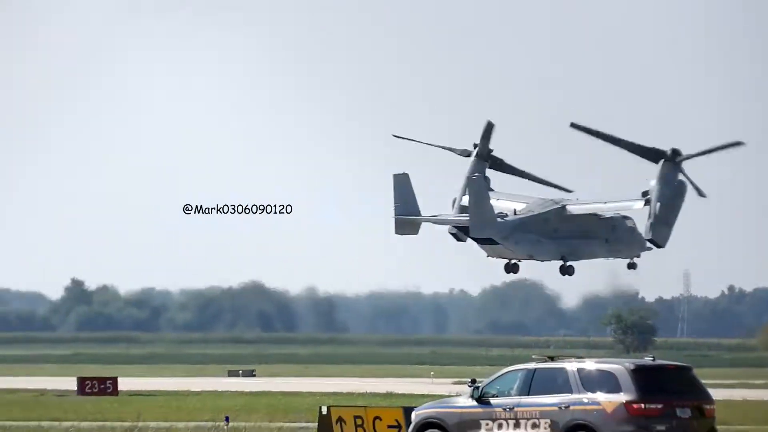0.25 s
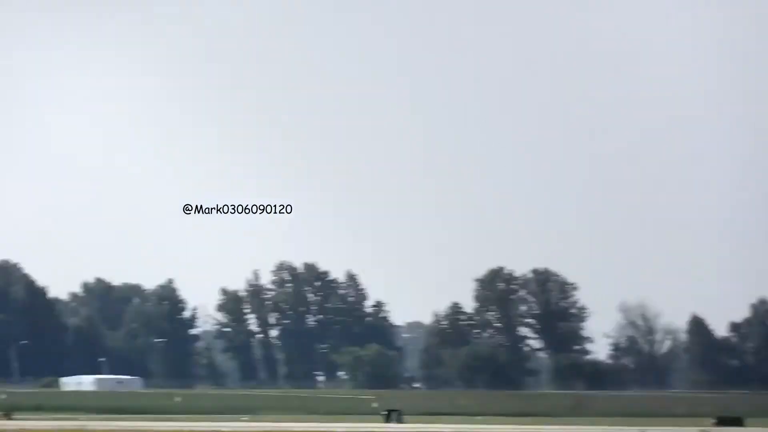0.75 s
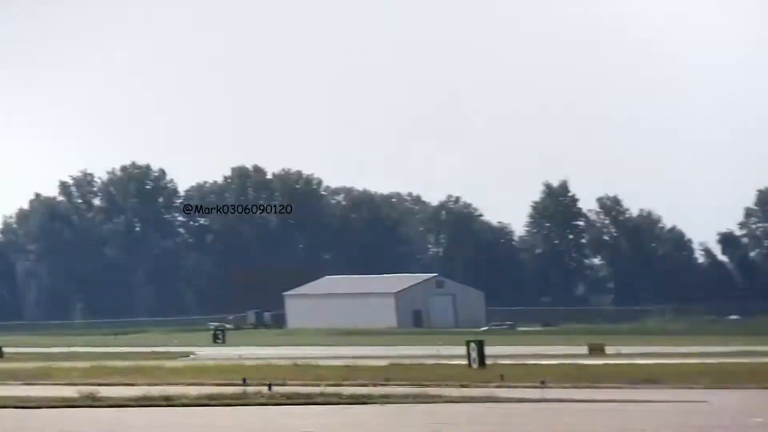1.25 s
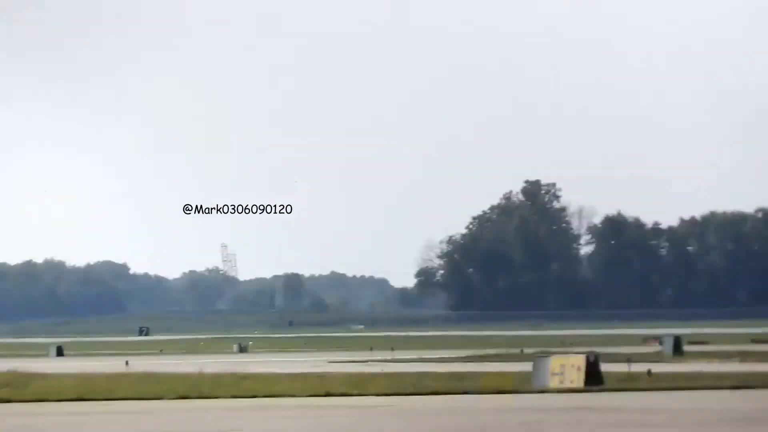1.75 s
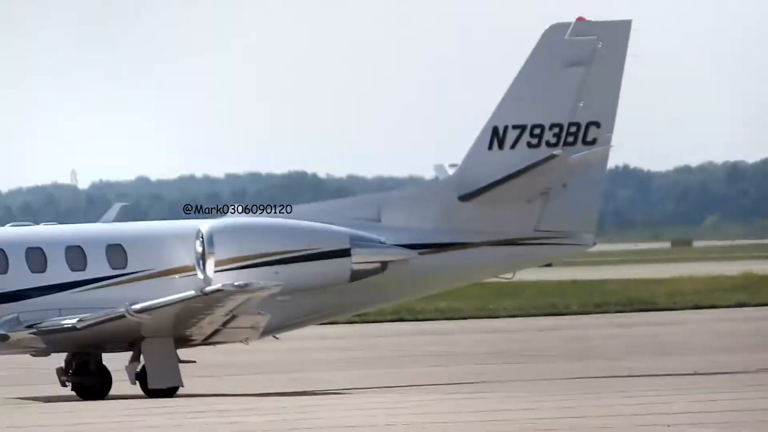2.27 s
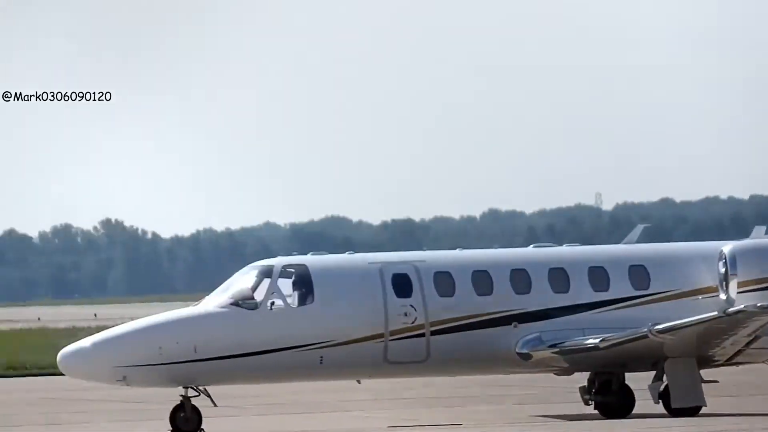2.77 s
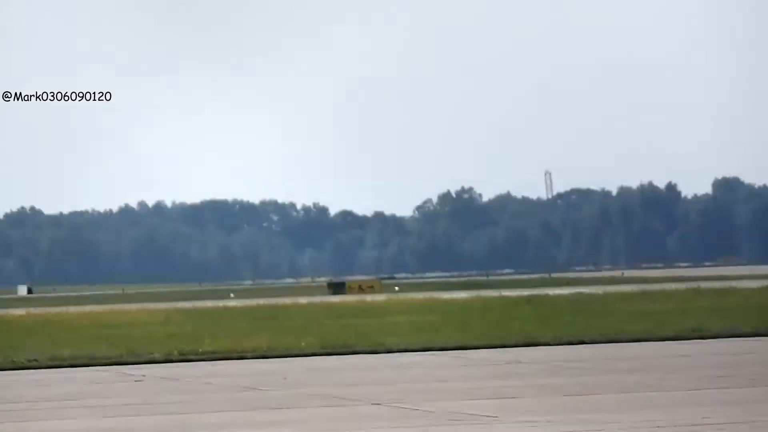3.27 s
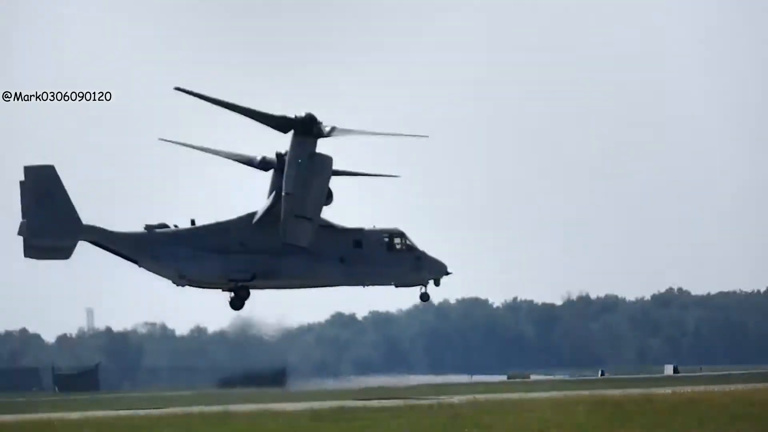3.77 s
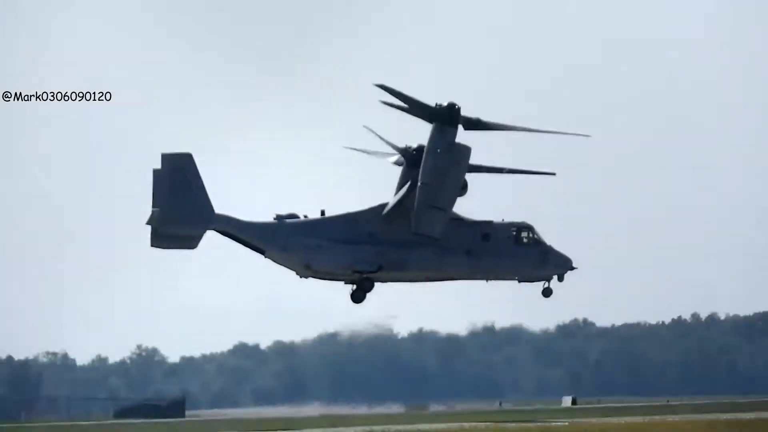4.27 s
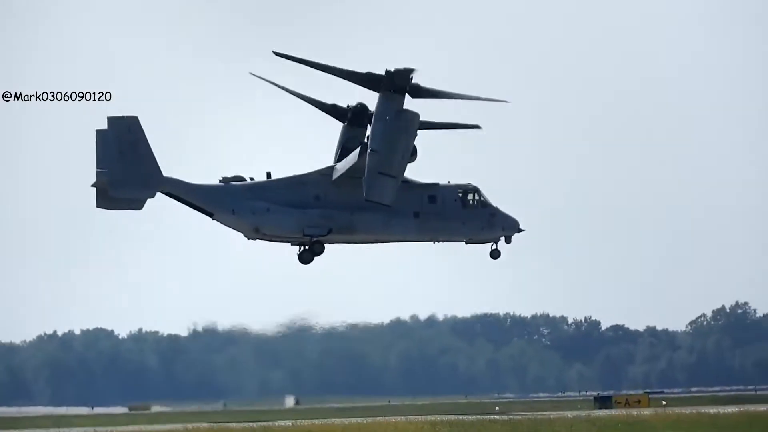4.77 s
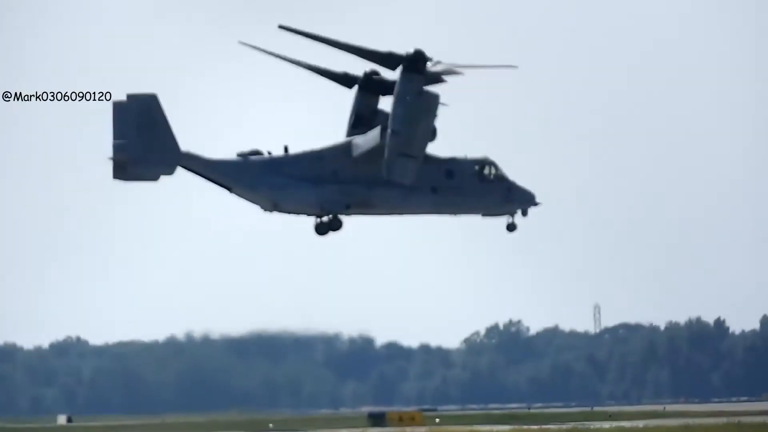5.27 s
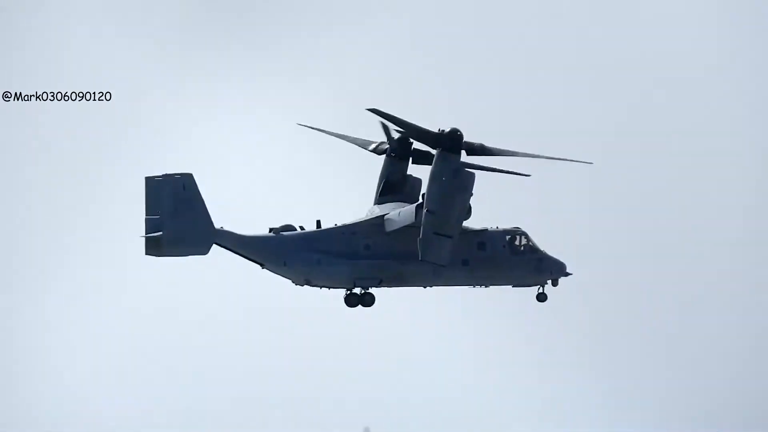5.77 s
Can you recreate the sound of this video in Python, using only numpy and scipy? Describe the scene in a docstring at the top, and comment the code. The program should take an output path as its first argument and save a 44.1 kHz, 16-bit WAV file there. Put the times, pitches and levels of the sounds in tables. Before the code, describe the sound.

Gusty, ragged wind puffs over a steady rotor throb and engine roar, then loud chopping blade slaps crackle and gradually soften.

```python
"""An airfield: tiltrotor aircraft lift off across it, heard by the two microphone ports of a small camera.
The right port faces aircraft and wind; the camera body shadows the left one, which is duller.
Noise in seven bands gives rotor thrum, turbine roar and thin jet hiss, chopped by blade throb and slaps.
Gusts of noise and short gliding swings buffet the right port, with a trace on the left.
Hard limiting flattens whatever exceeds full scale, as in the loudest bursts."""
import sys
import numpy as np
from scipy import signal
from scipy.fft import rfft, irfft
from scipy.io import wavfile
from scipy.ndimage import uniform_filter1d

SR = 44100
rng = np.random.default_rng(int(sys.argv[2]) if len(sys.argv) > 2 else 0)


def to_wav(s):
    """Save 16-bit WAV."""
    ch = np.atleast_2d(s).T  # columns
    pcm = np.round(np.clip(ch, -1, 1) * 32767)  # PCM
    wavfile.write(sys.argv[1], SR, pcm.astype(np.int16))


N = 265482

# Levels of the steady aircraft noise by band, low to high; one aircraft draws off, the next nears:
# t/s, deep thrum level/dB, rotor thrum level/dB, turbine roar level/dB, upper roar level/dB,
# top of the roar level/dB, lower jet hiss level/dB, upper jet hiss level/dB
FLIGHT_LEVELS = [(0.0, -40, -24, -29, -48, -40.5, -61, -54),
                 (0.3, -35.5, -21.5, -37, -39.5, -45, -49.5, -65),
                 (0.8, -35, -21, -35.5, -37.5, -49, -51, -61.5),
                 (1.2, -39, -24, -38, -40.5, -55.5, -58.5, -58.5),
                 (1.75, -39.5, -25.5, -34.5, -40.5, -49.5, -58.5, -55.5),
                 (2.2, -33, -21.5, -31.5, -34, -55, -62, -52.5),
                 (2.7, -32, -21.5, -26, -38, -45.5, -53.5, -54.5),
                 (3.15, -29, -20.5, -27.5, -37.5, -43.5, -54, -52),
                 (3.4, -28.5, -14.5, -21.5, -42, -42.5, -50, -53),
                 (3.8, -35.5, -17.5, -18, -33.5, -48, -45.5, -55),
                 (4.2, -30.5, -18.5, -22.5, -38.5, -41.5, -47.5, -53.5),
                 (4.75, -36.5, -20, -21, -44, -36.5, -51.5, -52.5),
                 (5.05, -30.5, -18, -21, -50, -41, -52.5, -56),
                 (5.6, -29.5, -22, -21.5, -51, -38.5, -53.5, -53.5),
                 (6.02, -34.5, -22, -23.5, -45, -39, -63, -56)]
# Blade throb; motion and a second aircraft shift the beat:
# t/s, lead over a steady beat/blade passes, depth/dB
BLADE_THROB = [(0, -1.56, -2), (.6, -1.49, 1.5), (1.4, -0.92, -0.5), (2.0, -0.91, 1.5), (2.6, -0.65, 1),
               (3.0, -0.46, 1.5), (3.4, -0.16, 2), (3.7, -0.067, 2), (4.0, -0.27, 2), (4.2, 0.42, 0.5),
               (4.6, .38, 2), (4.8, .5, 1.3), (5.05, 0.42, 0.2), (5.25, 0.82, -0.5), (5.7, 0.92, 1),
               (6.1, 0.95, -0.3)]
# Strong wind puffs at the right port: t/s, level/dB, f 1.2 ms before the peak/Hz, length/s
STRONG_PUFFS = [(0.131, -9.5, 1170, .0056), (0.139, -9, 797, .005), (0.169, -8.5, 874, .012),
                (0.1825, 1.5, 1050, .007), (0.25, -14.5, 2017, .0047), (0.258, -6, 1403, .006),
                (0.323, -10.5, 1300, .0062), (0.357, -19, 800, .01), (0.451, -15, 914, 0.0093),
                (0.458, -9.5, 897, 0.013), (0.541, -11, 804, 0.0047), (0.553, -4.5, 1150, .007),
                (0.575, -4.5, 1086, .004), (0.611, -16, 800, .012), (0.664, -15.5, 798, 0.014),
                (0.716, -13, 810, 0.0055), (0.763, -11, 800, .007), (0.785, -8.5, 1396, 0.0082),
                (0.811, -8.5, 807, 0.0063), (0.824, -10.5, 953, 0.011), (0.884, -10, 799, .006),
                (1.048, -6, 1294, .007), (1.063, -17, 1400, .004), (1.072, -8.5, 1705, .007),
                (1.085, -9, 830, .0063), (1.107, -10, 856, .009), (1.113, -11, 940, .009),
                (1.138, -11.5, 1274, .005), (1.185, -7.5, 1055, .006), (1.201, -8, 1167, .008),
                (1.232, -13, 1300, .0097), (1.276, -13.5, 1100, .005), (1.29, -11.5, 900, .008),
                (1.313, -9.5, 900, .005), (1.376, -15, 1300, .008), (1.418, -9, 1009, 0.006),
                (1.439, -10, 1078, .005), (1.446, -8.5, 1205, .007), (1.488, -11, 1338, 0.0045),
                (1.502, -12, 898, .006), (1.509, -5.5, 1450, .006), (1.66, -9.5, 1113, .008),
                (1.718, -13.5, 800, .013), (1.915, -9.5, 1025, .0057), (2.765, -6.5, 943, .005),
                (3.062, -11.5, 988, .011), (5.649, -10, 850, .008), (5.658, -8.5, 1150, .004),
                (5.668, -7.5, 990, .01), (5.685, -5, 1142, 0.007), (5.692, -9, 996, .008),
                (5.708, -7, 1200, .008), (5.739, -14.5, 936, .01), (5.875, -10, 880, .009)]
# Colour of the right port, with its bass cut and two resonances: f/Hz, level/dB
RIGHT_PORT_COLOUR = [(30, -62), (60, -55.5), (95, -47.5), (130, -36.5), (200, -21), (300, -9.5), (390, -7),
                     (450, -1), (540, -4), (670, 3), (790, 2), (900, -3.5), (1100, -3.5), (1500, -7),
                     (2000, -2), (2400, -0.5), (2750, -4.5), (3000, -10.5), (3300, -14), (4400, -26.5),
                     (4800, -33), (5600, -42.5), (7600, -49), (9000, -64), (11000, -74.5)]

BLADE_HZ = 20  # steady blade-pass beat, which the lead then shifts
PORT_LAG_S = .002  # the port rings up late
CRACK_S = .0055  # nominal length of a crack


def undb(db):
    """Amplitude ratio of a level in dB."""
    return 10 ** (np.asarray(db) / 20)


def curve(table):
    """Columns of a table joined by straight lines in time."""
    s, *columns = np.transpose(table)
    return [np.interp(np.arange(N) / SR, s, c) for c in columns]


def colour(x, points, size=2048):
    """Causal minimum-phase filter with the gain of (f/Hz, level/dB) points, from the folded cepstrum."""
    hz, db = np.transpose(points)
    f = np.maximum(np.arange(size // 2 + 1) * SR / size, 1)
    log_gain = np.interp(np.log(f), np.log(hz), db) * np.log(10) / 20
    cepstrum = irfft(log_gain)
    cepstrum[1:size // 2] *= 2
    cepstrum[size // 2 + 1:] = 0
    impulse = irfft(np.exp(rfft(cepstrum)))
    return signal.fftconvolve(x, impulse)[:N]


def bands(edges_hz):
    """One noise split at the edges; each part is scaled to rms 1 as heard through the right port."""
    spectrum = rfft(rng.standard_normal(N))
    f = np.arange(len(spectrum)) * SR / N
    slopes = [1 / (1 + (f / hz) ** 8) for hz in edges_hz]
    below = [np.zeros(len(f))] + slopes + [np.ones(len(f))]
    parts = [irfft(spectrum * (hi - lo), N) for lo, hi in zip(below, below[1:])]
    # the first third is enough to gauge the level
    return [p / np.std(colour(p[:N // 3], RIGHT_PORT_COLOUR)) for p in parts]


def flicker(rate, depth_db):
    """Gain that moves to a new random level rate times a second, slewed; mean power 1."""
    hold = max(int(SR / rate), 2)
    steps = np.repeat(rng.standard_normal(N // hold + 1), hold)
    walk = uniform_filter1d(steps, hold)[:N]
    gain = undb(depth_db * walk)
    return gain / np.sqrt(np.mean(gain ** 2))


def around(s, length):
    """Samples that a short event at s can reach, and their time from its peak in seconds."""
    near = slice(max(int((s - 3 * length) * SR), 0), int((s + 4 * length) * SR))
    return near, (np.arange(N) / SR)[near] - s


def bumps(times, dbs, lengths, rise=0.62, fall=1.52):
    """Power of short bursts that swell quicker than they fade."""
    power = np.zeros(N)
    for s, db, length in zip(times, dbs, lengths):
        near, dt = around(s, length)
        width = length * np.where(dt < 0, rise, fall) / 2
        power[near] += undb(2 * db) * np.exp(-(dt / width) ** 2)
    return power


def wavelets(times, dbs, lengths, from_hz, to_hz, rough, band_hz, rise, fall):
    """Short swings that glide from one pitch to another within a few ms, with a wandering phase."""
    out = np.zeros(N)
    wander = np.cumsum(uniform_filter1d(rng.standard_normal(N), size=12)) * rough
    for s, db, length, f0, f1 in zip(times, dbs, lengths, from_hz, to_hz):
        near, dt = around(s, length)
        # f0 at 1.2 ms before the peak, f1 at 1.8 ms after it, and a little beyond both
        hz = f1 * (f0 / f1) ** np.clip((.0018 - dt) / .003, -.4, 3.0)
        width = length * np.where(dt < 0, rise, fall) / 2
        shape = np.exp(-(dt / width) ** 2 / 2)
        swing = np.sin(2 * np.pi * np.cumsum(hz) / SR + wander[near])
        out[near] += np.sqrt(2) * undb(db) * shape * swing
    # the port passes neither deep bass nor high treble
    return signal.sosfiltfilt(signal.butter(4, band_hz, "band", fs=SR, output="sos"), out)


def aircraft(s, thump_s, thump_db, crack_db, length):
    """Rotor and engine noise in free air, twice: the direct sound and what scatters round the camera."""
    # borders between the seven bands: f/Hz
    split_hz = [350, 1450, 3300, 4200, 5400, 6400]
    # swing of each band between and on the blade passes, low to high: level/dB for each dB of throb
    chop_per_throb = [2.9, 1.23, 1.17, 1.3, 1.2, 1.2, 0.99]
    # a slap is a cluster of vortex hits, so its thump is ragged
    thumps = bumps(thump_s - PORT_LAG_S, thump_db, length, rise=0.55, fall=1.25)
    thumps = thumps * flicker(240, 2.6) ** 2
    cracks = bumps(s, crack_db, np.full(len(s), 0.33 * CRACK_S))
    # between the slaps the blades still throb, and turbulence roughens everything at once
    lead, depth_db = curve(BLADE_THROB)
    swing = np.cos(2 * np.pi * (BLADE_HZ * np.arange(N) / SR + lead - .08))
    rough = flicker(70, 0.94)
    throbs = [undb(chop * depth_db * swing) * rough for chop in chop_per_throb]
    # slap power in each band: thumps lie low, cracks high
    slap_powers = (undb(-30.0) * thumps,
                   undb(-11) * thumps,
                   undb(-41.5) * thumps + undb(-6.5) * cracks,
                   undb(-43) * cracks,
                   undb(-40.5) * cracks,
                   undb(-60) * cracks,
                   undb(-64) * cracks)
    gains = []
    for db, throb, slap_power in zip(curve(FLIGHT_LEVELS), throbs, slap_powers):
        steady = undb(db) * throb * flicker(28, 0.95)
        gains.append(np.sqrt(steady ** 2 + slap_power))
    # same gains, independent noise
    return [sum(gain * part for gain, part in zip(gains, bands(split_hz))) for _ in range(2)]


def slaps():
    """Blade slaps as columns (t, thump t, thump dB, crack dB, length): strong ones, faint ones on the beat."""
    # the strong slaps: t/s, dull thump level/dB, sharp crack level/dB, length of the thump/s
    strong = [(0.558, -11, -40, 0.025), (0.672, -16.5, -29, 0.017), (0.763, -14, -31, 0.019),
              (1.947, -16, -32, 0.0077), (1.999, -16.5, -33, 0.016), (2.042, -22, -22, .015),
              (2.095, -15.5, -24, 0.025), (2.152, -18, -19.5, .015), (2.2025, -29, -16.5, 0.018),
              (2.339, -17, -44, .036), (2.4464, -40, -17, 0.04), (2.4998, -25, -13.5, 0.017),
              (2.5916, -22, -10, 0.014), (2.641, -18, -16, .014), (2.69, -20, -17.5, 0.013),
              (2.786, -26, -22, .014), (2.855, -16, -34, .014), (2.925, -12, -13.5, 0.013),
              (2.973, -21, -20, .016), (3.016, -32, -33, 0.011), (3.128, -13, -16.5, 0.024),
              (3.165, -11, -34, 0.017), (3.2222, -18, -11.5, .015), (3.264, -13, -31, 0.017),
              (3.3095, -10, -5.5, 0.011), (3.3555, -4, -7.5, 0.0088), (3.359, -2, -7, 0.014),
              (3.3635, -7.5, -7, 0.012), (3.369, -13, -9, 0.01), (3.4088, -2.5, -3.5, .012),
              (3.4585, -7, -7.5, .011), (3.476, -17, -35, 0.0069), (3.5025, -25, -10, 0.0054),
              (3.509, -1.5, -1.5, 0.0085), (3.5609, -19, -15, .01), (3.571, -15, -12, 0.032),
              (3.609, -11, -17, .01), (3.6232, -5.5, -6.5, .014), (3.672, -3.5, -12.5, 0.0055),
              (3.7198, -10, -2, 0.011), (3.756, -13, -19, 0.0064), (3.7685, -13, -5, 0.018),
              (3.817, -10, -8, 0.011), (3.8625, -12, -5, 0.014), (3.8745, -11, -14, 0.018),
              (3.9146, -14, -8, 0.01), (3.9625, -32, -12.5, 0.011), (4.0124, -15, -13, .015),
              (4.045, -10.5, -28, 0.013), (4.0638, -21, -15, 0.026), (4.139, -7.5, -15, 0.019),
              (4.187, -9.5, -36, 0.017), (4.236, -10.5, -35, .018), (4.285, -4.5, -30, 0.0068),
              (4.306, -10, -21, 0.017), (4.336, -7.5, -24, 0.0089), (4.385, -12, -19, 0.015),
              (4.407, -10, -31, 0.0047), (4.432, -13.5, -28, .017), (4.485, -18, -21, .014),
              (4.537, -22, -16, 0.015), (4.5706, -22, -15, 0.01), (4.817, -13, -16, .012),
              (4.826, -17, -13, 0.017), (4.834, -27, -12, .01), (4.862, -19, -22, 0.018),
              (4.8784, -23, -12, .01), (4.924, -17.5, -19, .021), (5.262, -13, -17, .017),
              (5.4007, -19, -15.5, 0.017), (5.8612, -30, -20.5, 0.025)]
    thump_lag = 0.2064  # the thump peaks after its crack by this share of its length
    # faint slaps: thump over the thrum, crack over the roar, and their scatter
    pass_thump_db, pass_crack_db, pass_scatter_db, pass_s = -4, -1, 3, .016
    pass_per_throb = 2.2  # dB of slap for each dB of throb
    _, thrum_db, roar_db, *_ = curve(FLIGHT_LEVELS)
    lead, depth_db = curve(BLADE_THROB)
    # the deeper the throb, the harder each pass slaps
    thrum_db = thrum_db + pass_per_throb * depth_db
    roar_db = roar_db + pass_per_throb * depth_db
    beat = np.floor(BLADE_HZ * np.arange(N) / SR + lead)
    at = np.flatnonzero(np.diff(beat) > 0)
    chance = rng.standard_normal((len(at), 3)).T
    faint = np.transpose([at / SR + .003 * chance[0],
                          thrum_db[at] + pass_thump_db + pass_scatter_db * chance[1],
                          roar_db[at] + pass_crack_db + pass_scatter_db * chance[2],
                          np.full(len(at), pass_s)])
    # no faint slap within half a pass of a strong one
    free = np.abs(faint[:, :1] - np.array(strong)[:, 0]).min(axis=1) > .5 / BLADE_HZ
    s, thump_db, crack_db, length = np.transpose(np.vstack([strong, faint[free]]))
    return s, s + thump_lag * length, thump_db, crack_db, length


def slap_rings(s, thump_s, thump_db, crack_db, length):
    """Each crack rings the upper resonance of the port, each thump the lower one."""
    crack_hz = 2189 * np.exp(0.0567 * rng.standard_normal(len(s)))
    cracks = wavelets(s, crack_db, np.full(len(s), .9 * CRACK_S), 0.91 * crack_hz, crack_hz,
                      rough=0.27, band_hz=[700, 5200], rise=0.81, fall=0.79)
    thump_hz = np.full(len(s), 670.5)
    thumps = wavelets(thump_s, thump_db - 1.9, .65 * length, thump_hz, thump_hz,
                      rough=0.0598, band_hz=[350, 1300], rise=0.55, fall=0.85)
    return cracks + thumps


def wind():
    """Eddies on the right port: a ragged rumble, and puffs that mostly fall in pitch as the eddy slows."""
    # gusts at the right port, ahead of the rumble's own offsets: t/s, level/dB
    gust_levels = [(0.0, -36), (0.25, -27), (0.4, -34), (0.65, -27.5), (1.0, -28.5), (1.36, -20.5),
                   (1.6, -21.5), (1.75, -33), (1.88, -29), (2.05, -31), (2.75, -32.5), (2.88, -28),
                   (3.12, -21), (3.25, -40), (5.3, -28.5), (5.52, -25.5), (5.63, -24.5), (5.69, -19),
                   (5.77, -28), (6.02, -22.5)]
    # borders of the bands that eddies excite: f/Hz
    wind_hz = [400, 850, 1400, 3400]
    gust_db, = curve(gust_levels)
    s, db, from_hz, length = np.transpose(np.vstack([STRONG_PUFFS, flurry(gust_db)]))
    # pitch 1.8 ms after the peak, scattered
    to_hz = 760.6 * np.exp(.08 * rng.standard_normal(len(s)))
    low, body, bright, edge, _ = bands(wind_hz)
    power = undb(2 * gust_db - 3) * flicker(140, 2.85) ** 2
    power = power + bumps(s - PORT_LAG_S / 2, db - 8.0, length, rise=0.52, fall=1.7)
    # the further a puff falls in pitch, the stronger the bright tick that opens it
    tick_db = db - 24.5 + 14 * np.log2(from_hz / to_hz)
    ticks = bumps(s - .003, tick_db, np.full(len(s), .003))
    rumble = np.sqrt(power) * (undb(-10.5) * low + body + undb(-2.0) * bright)
    rumble = rumble + np.sqrt(undb(-43.5) * power + ticks) * edge
    puffs = wavelets(s, db, length, from_hz, to_hz,
                     rough=0.1016, band_hz=[330, 3900], rise=0.56, fall=1.0)
    return colour(rumble, RIGHT_PORT_COLOUR) + puffs


def flurry(gust_db, count=270):
    """Small puffs at jittered moments that follow the gust level: columns (t/s, level/dB, f/Hz, length/s)."""
    per_s, over_gust_db, scatter_db = 45, 4.5, 2.5
    when, size, pitch, length = rng.standard_normal((count, 4)).T
    s = np.clip((np.arange(count) + .5 * when) / per_s, 0, (N - 1) / SR)
    db = gust_db[(s * SR).astype(int)] + over_gust_db + scatter_db * size
    # a strong puff leaves no room for a small one
    free = np.abs(s[:, None] - np.array(STRONG_PUFFS)[:, 0]).min(axis=1) > .008
    return np.transpose([s, db, 1000 * np.exp(.2 * pitch), .005 * np.exp(0.32 * length)])[free]


def scene():
    """Sound at the two ports, left first; the body dulls the left one, which gets a trace of the wind."""
    # shadow of the camera body, left port against right: f/Hz, level/dB
    left_shadow = [(130, -6.5), (300, -7), (560, -10.5), (1100, -13.5), (1750, -22), (2500, -18),
                   (3050, -12), (3700, -17.5), (5000, -27.5), (7500, -21.5)]
    # share of the left sound that comes round the body by other paths: f/Hz, level/dB
    scatter_colour = [(130, -0.5), (300, -6), (1100, -3), (2300, -3.5), (3500, -3), (6000, 5.5)]
    hits = slaps()
    direct, scattered = (colour(x, RIGHT_PORT_COLOUR) for x in aircraft(*hits))
    direct = direct + slap_rings(*hits)
    eddies = wind()
    left = direct + colour(scattered, scatter_colour) + undb(-19.5) * eddies
    left = colour(left, left_shadow)
    return np.array([np.roll(left, 1), direct + eddies])  # the left port lies one sample further off


def record(dry):
    """Self-noise, a lopsided response that gives loud bursts a low thud, hard overload, a steep top cut."""
    self_noise_db, lopsided_db, top_hz = -70.5, -36, 15700
    hiss = undb(self_noise_db) * rng.standard_normal(dry.shape)
    # the squared sound, less its steady part
    thud = signal.sosfilt(signal.butter(1, 12, "high", fs=SR, output="sos"), dry ** 2)
    clipped = np.clip(undb(-3.0) * dry + undb(lopsided_db) * thud + hiss, -1, 1)
    top_cut = signal.ellip(8, .2, 60, top_hz, fs=SR, output="sos")
    return np.clip(signal.sosfilt(top_cut, clipped), -1, 1)


dry = scene()
out = record(dry)
to_wav(out)
```